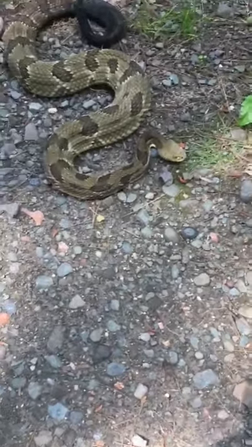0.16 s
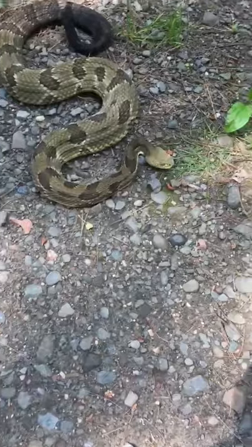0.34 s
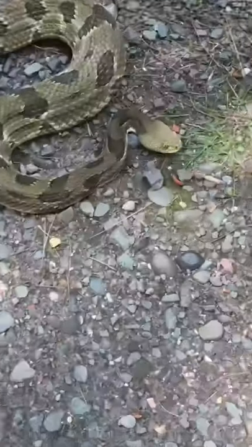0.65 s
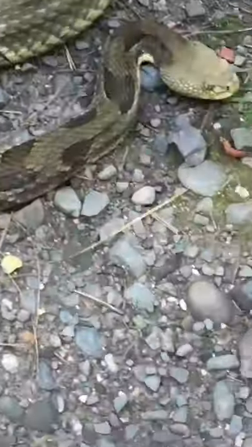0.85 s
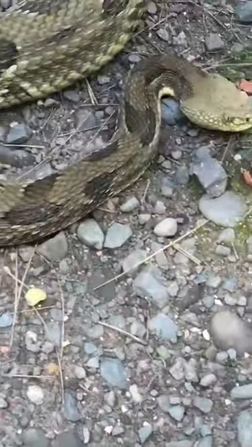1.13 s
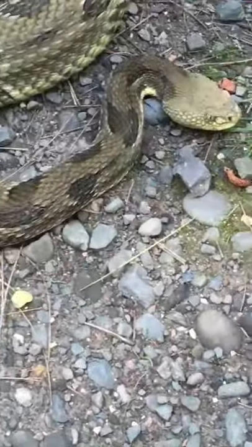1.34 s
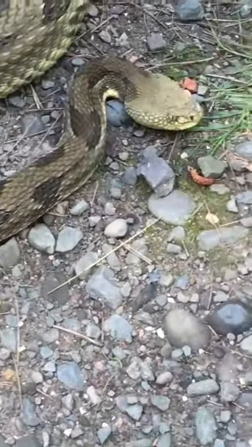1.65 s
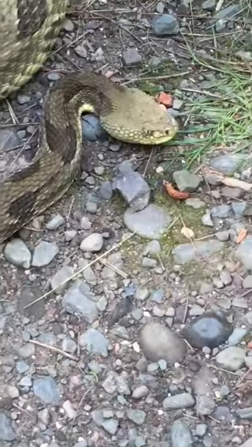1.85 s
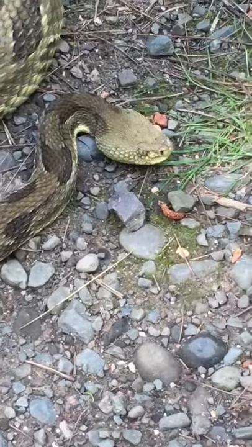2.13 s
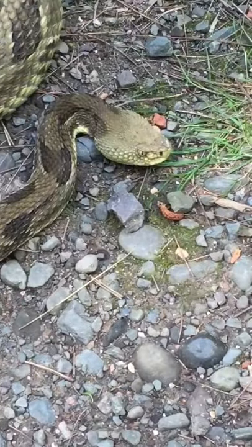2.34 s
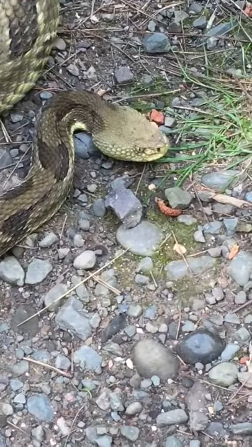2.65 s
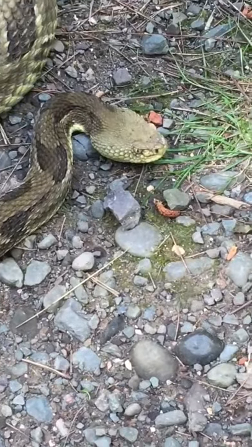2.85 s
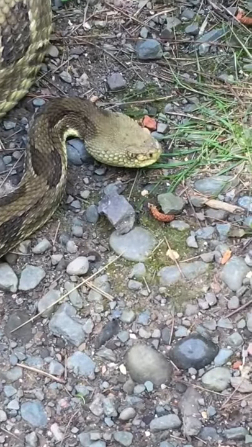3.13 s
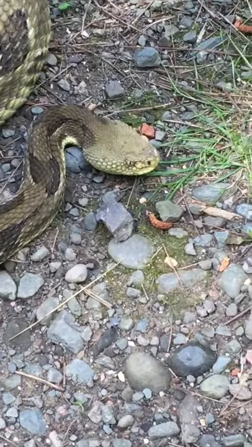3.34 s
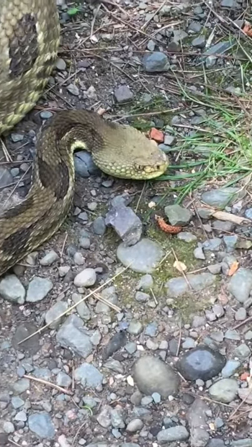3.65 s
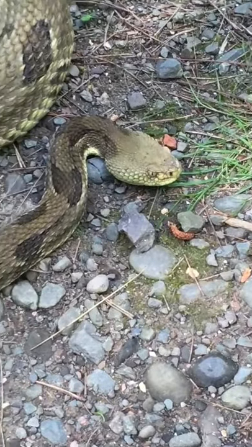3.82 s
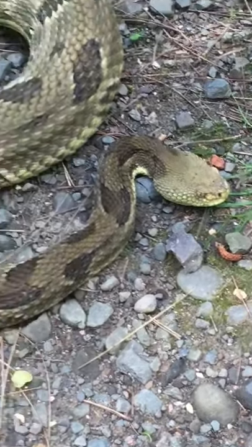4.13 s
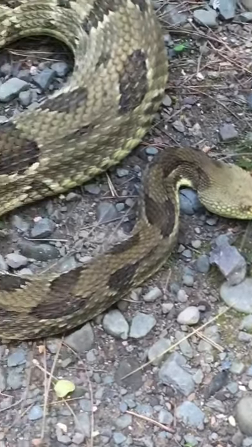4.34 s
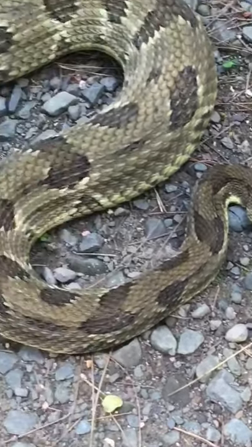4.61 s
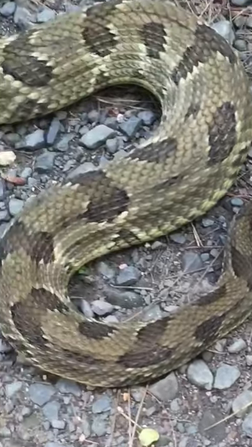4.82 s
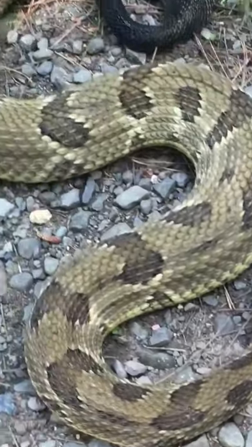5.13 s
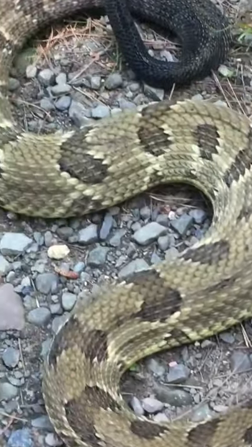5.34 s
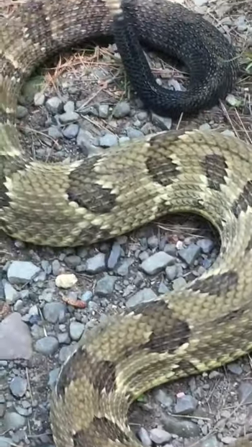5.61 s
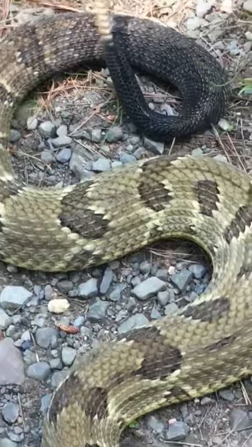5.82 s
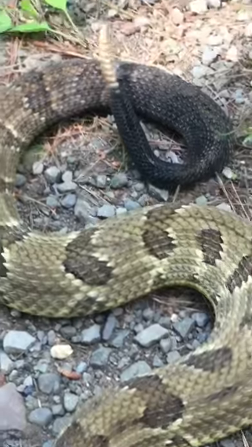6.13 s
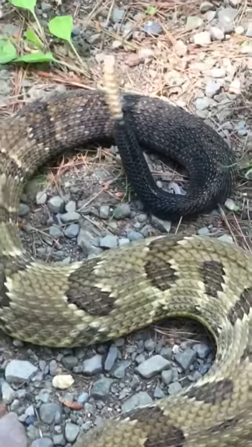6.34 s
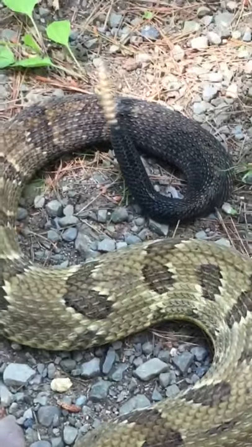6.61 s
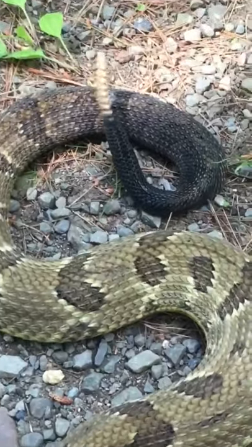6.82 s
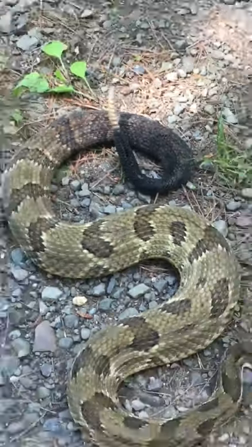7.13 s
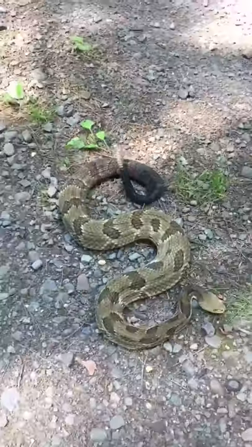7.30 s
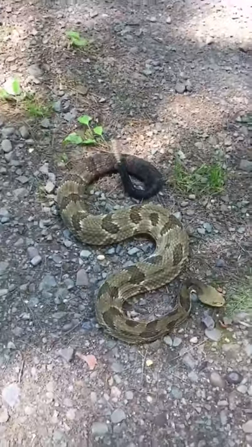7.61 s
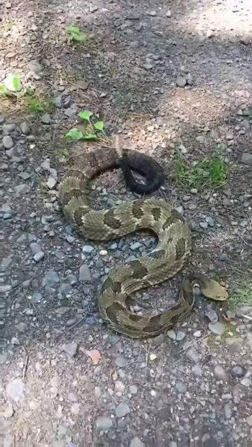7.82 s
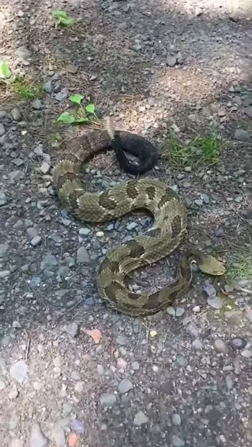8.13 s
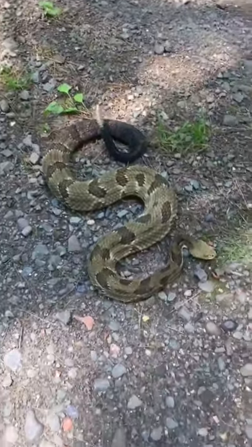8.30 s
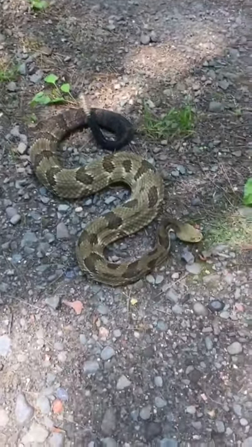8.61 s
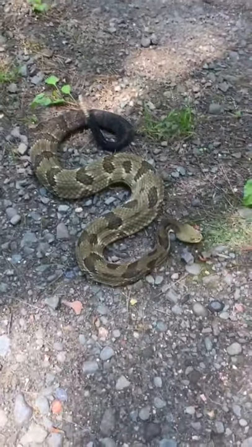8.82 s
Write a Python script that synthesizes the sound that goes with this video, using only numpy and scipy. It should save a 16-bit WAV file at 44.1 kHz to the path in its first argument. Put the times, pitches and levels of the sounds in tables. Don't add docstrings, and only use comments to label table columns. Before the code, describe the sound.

The sound starts with a rattlesnake's tail already in full buzz, close to a phone outdoors, and it never pauses for about 9 seconds. It is a dry, bright, sizzling rattle: countless tiny hard clacks of hollow segments, fluttering about 130 times a second, strongest from roughly 4 to 9 kHz. Slight swells come about three times a second, most noticeable in the first 2 seconds. Near 4.3 s a finger makes one small dull tick on the phone's case. Between about 4.4 and 5 s the microphone swings toward the tail and the buzz changes colour subtly, barely louder; it stays so until about 8.3 s, then shifts back toward the earlier tone. Underneath throughout are a faint low rumble of far traffic and air and the steady hum of a distant idling engine, slightly duller while the phone faces the tail.

```python
import sys
import numpy as np
from scipy import signal
from scipy.fft import rfft, irfft
from scipy.io import wavfile
from scipy.ndimage import uniform_filter1d

SR = 44100
rng = np.random.default_rng(int(sys.argv[2]) if len(sys.argv) > 2 else 0)


def master(y):
    cut = np.clip(np.atleast_2d(y).T, -1, 1)
    pcm = np.round(cut * 32767)
    wavfile.write(sys.argv[1], SR, pcm.astype(np.int16))


def level_to_linear(level):
    exponent = np.asarray(level, float) / 20
    return 10 ** exponent


N = 395136


def rms_one(x):
    return x / np.sqrt(np.mean(x ** 2) + 1e-20)


def in_time(rows):
    s, *columns = np.transpose(rows)
    return [np.interp(np.arange(N) / SR, s, c) for c in columns]


def drift(rate):
    r = np.exp(-80 * np.pi * rate / SR)
    noise = rng.standard_normal(N // 40 + 2002)
    slow = signal.lfilter([1], [1, -2 * r, r * r], noise)[2000:]
    return np.interp(np.arange(N) / 40, np.arange(len(slow)), rms_one(slow))


def resonate(x, hz, width_hz):
    r = np.exp(-np.pi * width_hz / SR)
    zeros = np.array([1, 0, -1]) * (1 - r * r) / 2
    poles = [1, -2 * r * np.cos(2 * np.pi * hz / SR), r * r]
    return signal.lfilter(zeros, poles, x)


def colour(x, points):
    hz, power = signal.welch(x, SR, nperseg=2048)
    own = np.log(uniform_filter1d(power, size=9) + 1e-4 * power.max()) / 2
    point_hz, point_db = np.array(points).T
    want = np.interp(np.log(hz + 1), np.log(point_hz), point_db) * np.log(10) / 20
    cepstrum = irfft(want - own)
    cepstrum[1:1024] *= 2
    cepstrum[1025:] = 0
    impulse = irfft(np.exp(rfft(cepstrum)))
    return rms_one(signal.oaconvolve(x, impulse)[:N])


# start_s, strokes_per_s
SHAKE = [(0.0, 129.03), (1.09, 129.01), (1.47, 127.65), (1.68, 128.58), (2.82, 129.84), (3.19, 129.07),
         (3.69, 131.47), (4.18, 127.92), (5.52, 132.84), (5.62, 130.43), (5.94, 132.08), (7.0, 128.72),
         (7.74, 129.25), (8.0, 130.39), (8.96, 130.13)]
# pitch_hz, level_db
LEFT_OVER_RIGHT = [(4000, 0), (5200, -1.3), (6800, .4), (8500, 1.0), (11500, -.9), (14000, .5)]


def clacks(per_s, depth, swing_db, spread_db, width_hz, stroke_db, sway_db):
    stroke = 0.09 + np.cumsum(in_time(SHAKE)[0]) / SR
    turn = np.cos(2 * np.pi * stroke) - .25 * np.cos(4 * np.pi * stroke - .3)
    side = np.cos(np.pi * stroke)
    stroke_force = level_to_linear(stroke_db * rng.standard_normal(1200))
    force = stroke_force[(stroke + .5).astype(int).clip(0)]

    born = rng.random(N) < per_s * np.clip(1 + depth * turn, .4, 3) / SR
    hardness = level_to_linear(swing_db * turn + spread_db * np.minimum(rng.exponential(1, N), 4))
    contacts = born * force * hardness * rng.choice([-1, 1], N)

    shell_pitches_hz = np.linspace(3400, 16000, num=18)
    shell_hit = rng.integers(0, 18, N)
    rings = 0
    for shell, hz in enumerate(shell_pitches_hz):
        shell_db = side * np.interp(hz, *np.transpose(LEFT_OVER_RIGHT)) + sway_db * drift(2.2)
        hits = contacts * (shell_hit == shell) * level_to_linear(shell_db)
        rings = rings + resonate(hits + 1e-18, hz, width_hz)
    return rings + 0.044 * contacts, rms_one(contacts)


# middle_s, swell_db
TAIL_ROLLS = [(.25, 6), (.57, 6.5), (.97, 5), (1.38, 4.5), (1.85, 3.5), (2.12, 0.5), (2.53, 3), (2.9, 3),
              (3.23, 3), (3.66, 1), (3.95, 2), (4.57, 2.5), (4.86, 2), (5.17, 2), (5.48, 2.5), (5.8, 4),
              (6.78, 2), (7.37, 3), (7.66, 2.5), (8.23, 2)]


def roll():
    half_length_s = 0.053
    t = np.arange(0, N, 40) / SR
    swell_db = sum(db * np.exp(-.5 * ((t - s) / half_length_s) ** 2) for s, db in TAIL_ROLLS)
    return np.interp(np.arange(N) / SR, t, swell_db - swell_db.mean())


# time_s, facing_share
MICROPHONE_AIM = [
    (0, 0.27),
    (4.4, 0.23),
    (4.75, 0.44),
    (5.0, 0.87),
    (8.3, 0.8),
    (8.96, 0.2),
]


def aim():
    return np.clip(in_time(MICROPHONE_AIM)[0], 0, 1)


# pitch_hz, level_db (per Hz)
ASIDE_COLOUR = [(1530, -63.5), (2600, -26), (3330, -22.5), (3830, -8), (4190, -9.5), (4800, -5),
                (5530, 0.5), (6520, -4), (6970, -1.5), (7970, -4.5), (9330, -7.5), (10300, -14),
                (11700, -16), (13300, -9.5), (15500, -11)]
# pitch_hz, level_db (per Hz)
FACING_COLOUR = [(1530, -38), (2600, -23.5), (3250, -23.5), (3750, -9), (3950, -3.5), (4350, -9),
                 (4660, -5), (5250, -0.5), (5910, -6), (6470, 2), (7130, -4), (9750, -9), (10700, -16.5),
                 (13200, -8), (15500, -11.5)]
# pitch_hz, width_hz, share_taken_out
RATTLE_NOTCHES = [(4300, 160, 0.37), (5800, 180, 0.19), (10270, 200, 0.26)]
# pitch_hz, width_hz, level_db
LOW_MODES = [(1250, 80, -28), (1505, 122, -23.5), (1695, 250, -24), (1854, 287, -24), (2300, 340, -24.5)]


def rattle():
    swell_db, facing = roll(), aim()
    raw, contacts = clacks(per_s=22000, depth=.2, swing_db=1.85, spread_db=2.4, width_hz=1100,
                           stroke_db=0.43, sway_db=.4)
    bright = (1 - facing) * colour(raw, ASIDE_COLOUR) + facing * colour(raw, FACING_COLOUR)
    bright += (level_to_linear(swell_db) - 1) * resonate(bright, 5300, 790)
    for hz, width_hz, share in RATTLE_NOTCHES:
        bright = bright - np.clip(share, 0, 1) * resonate(bright, hz, width_hz)

    low = 0
    for hz, width_hz, db in LOW_MODES:
        low = low + level_to_linear(db + 12.5) * resonate(resonate(contacts, hz, width_hz), hz, width_hz)

    aside_db, facing_gain_db = -24, 0.48
    roll_hides = 0.11
    return level_to_linear(aside_db + facing_gain_db * facing - roll_hides * swell_db) * (bright + low)


# start_s, peak_db
FINGER_TAP = [
    (4.291, -30),
]


def tap():
    click = np.zeros(N)
    for s, db in FINGER_TAP:
        click[round((s + .0015) * SR)] = level_to_linear(db + 27)
    return resonate(resonate(click + 1e-18, 800, 1000), 800, 1000)


# multiple_of_firing_rate, level_db (rms)
FIRING_ORDERS = [(2, -65), (5, -68.5), (7, -66), (8, -82), (10, -62.5), (12, -72.5), (15, -63), (17, -66.5),
                 (18, -66), (19, -84), (24, -67), (35, -88)]
# multiple_of_its_rate, level_db (rms)
SECOND_ORDERS = [(1, -54.5), (2, -48), (3, -62.5)]


def engine():
    t = np.arange(N) / SR
    shade = -1.3 * aim()
    firing_hz, second_hz = 40.45, 41.4
    out = np.zeros(N)
    for base_hz, orders, wander in ((firing_hz, FIRING_ORDERS, .028), (second_hz, SECOND_ORDERS, .05)):
        turns = base_hz * t + wander * drift(0.95)
        for order, db in orders:
            sway_db = 0.5 + 0.053 * order
            level = np.sqrt(2) * level_to_linear(db + sway_db * (drift(4.0) + shade))
            out += level * np.sin(2 * np.pi * (round(order) * turns + rng.random()))
    return out


# pitch_hz, level_db (per Hz)
RUMBLE_COLOUR = [(15, -38), (25, -8), (92, 0), (224, -8.5), (304, -8.5), (504, -15), (593, -12.5),
                 (657, -17.5), (788, -15.5), (1340, -18), (1480, -15.5), (2780, -21), (3200, -17.5),
                 (4160, -40), (7040, -120)]
# pitch_hz, width_hz, level_db
RUMBLE_BOOMS = [(55.3, 13, 0.5), (97.2, 6, 7.5), (130.5, 34, 1.5), (174, 16, 1), (289, 42, -1)]


def rumble():
    air = colour(rng.standard_normal(N), RUMBLE_COLOUR)
    air = signal.sosfilt(signal.butter(2, 70, "high", fs=SR, output="sos"), air)
    air = air + sum(level_to_linear(db) * resonate(air, hz, width_hz) for hz, width_hz, db in RUMBLE_BOOMS)
    aside_db, shade_db = -42, -2.5
    return level_to_linear(aside_db + shade_db * aim() + .4 * drift(2.5)) * rms_one(air)


def scene():
    return (rattle() + tap() + engine() + rumble())[None]


def roll_off(x):
    return signal.sosfilt(signal.butter(12, 16590, fs=SR, output="sos"), x)


def record(dry):
    dry = signal.sosfilt(signal.butter(3, 36, "high", fs=SR, output="sos"), dry)
    hz = np.arange(N // 2 + 1) * SR / N
    mix = irfft(rfft(dry) * (hz < 15725), N)
    return roll_off(mix)


dry = scene()
out = record(dry)
master(out)
```